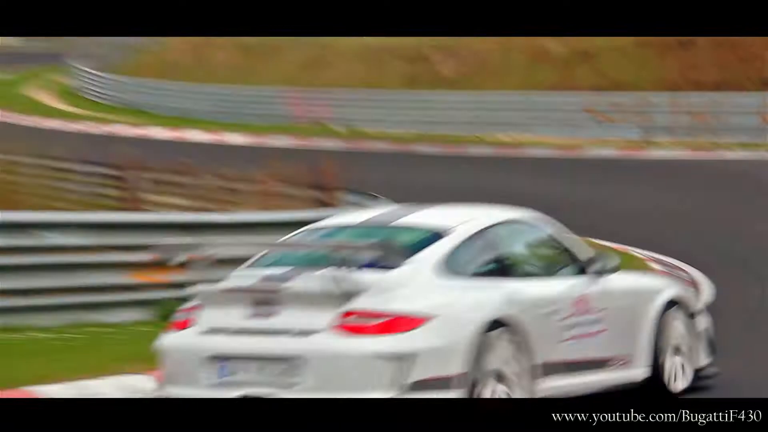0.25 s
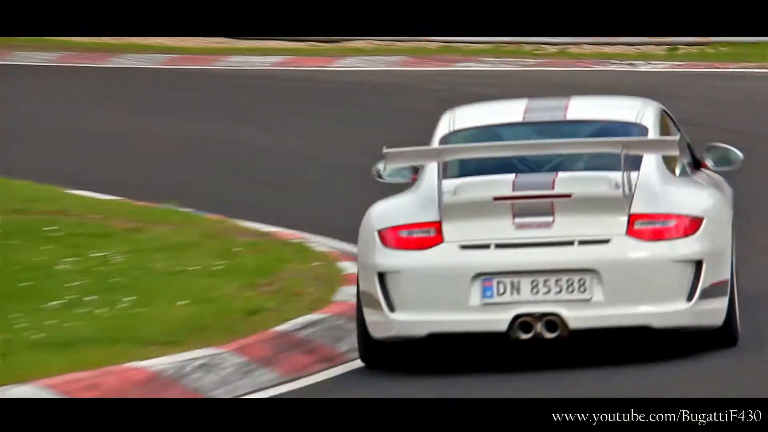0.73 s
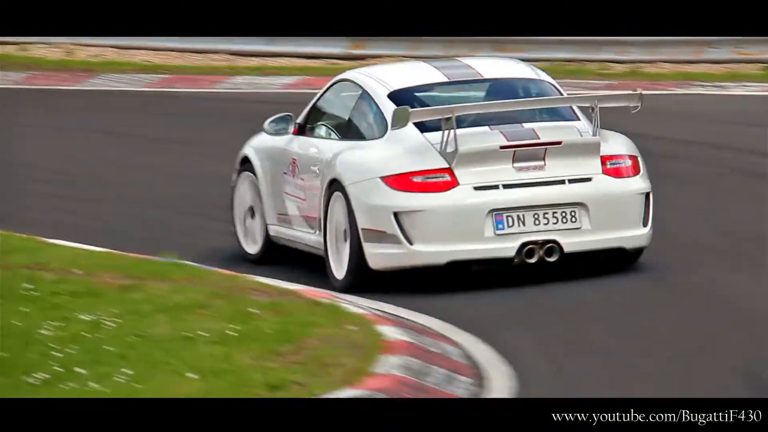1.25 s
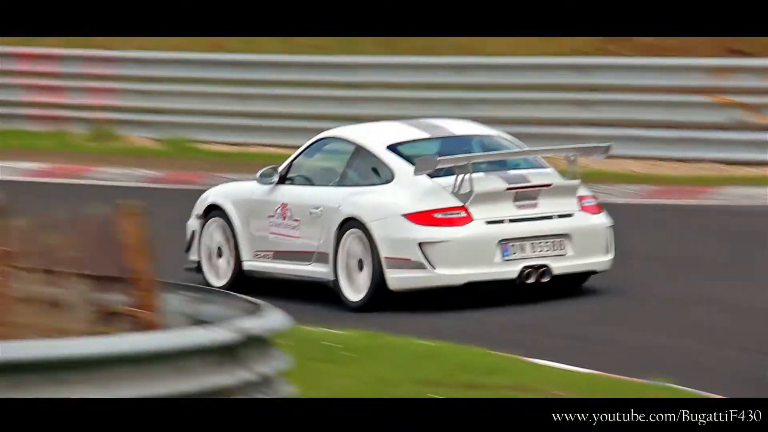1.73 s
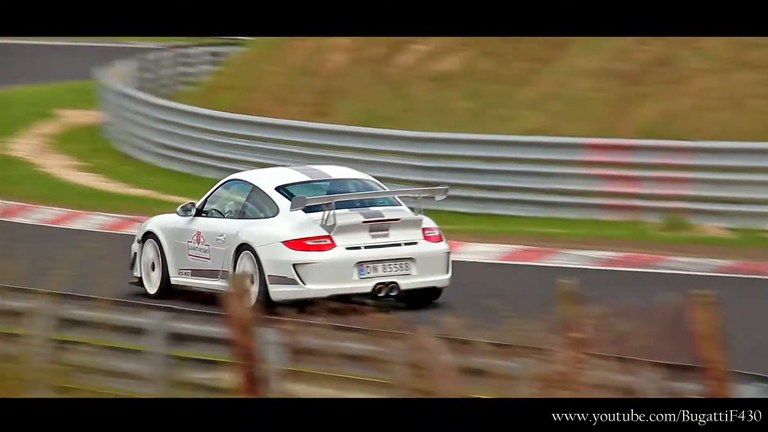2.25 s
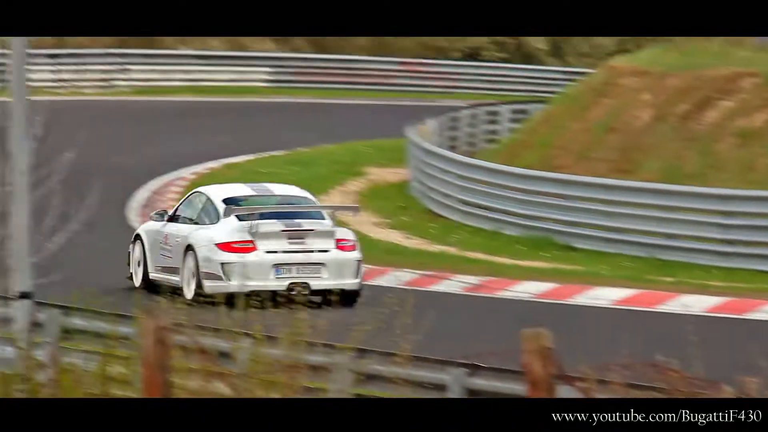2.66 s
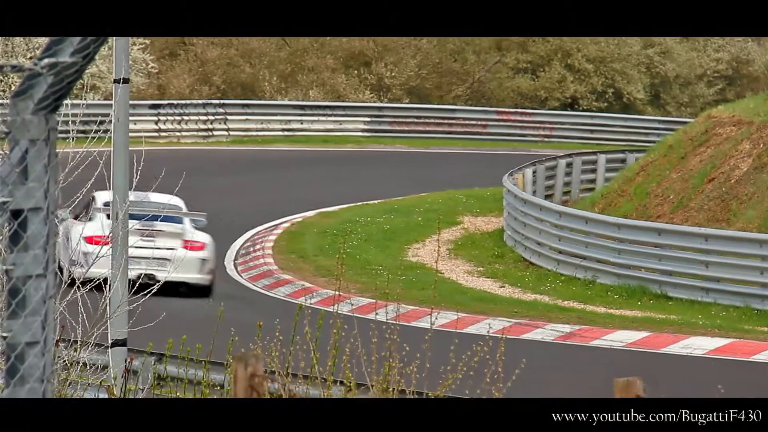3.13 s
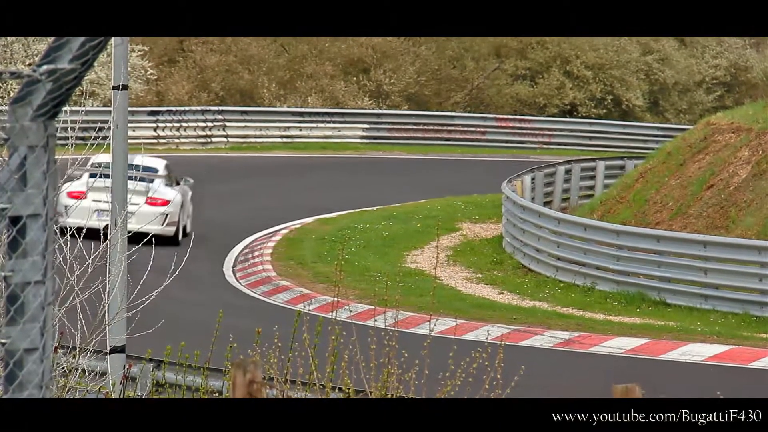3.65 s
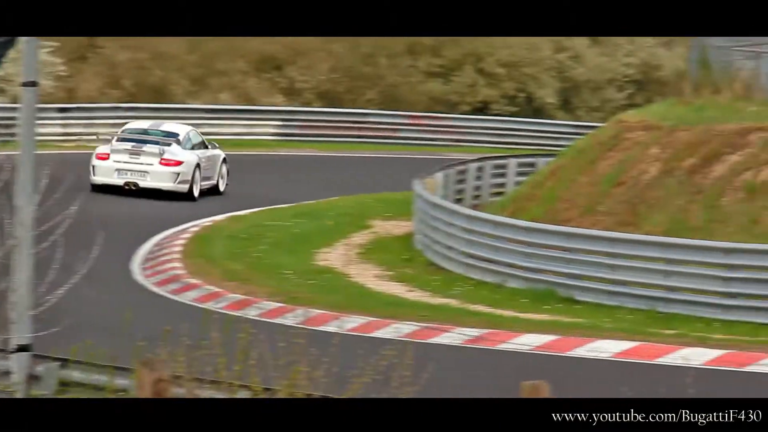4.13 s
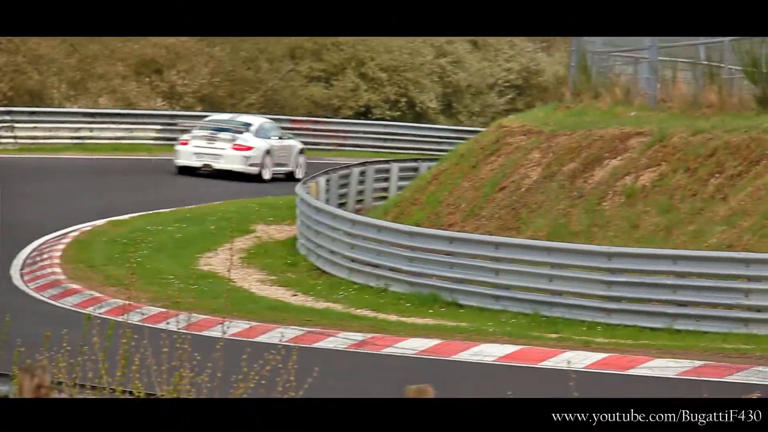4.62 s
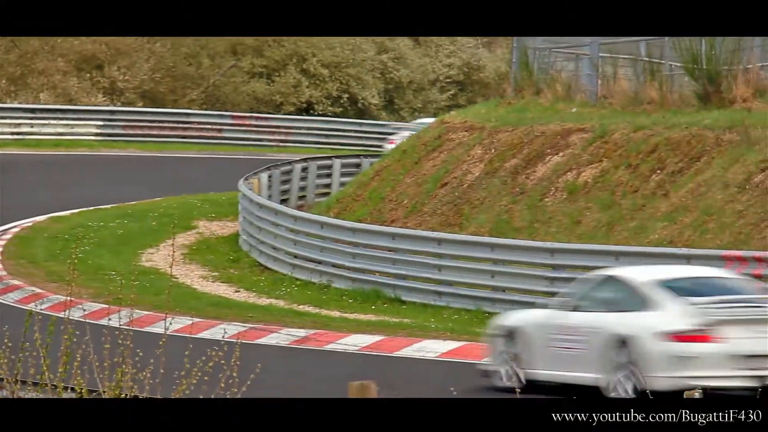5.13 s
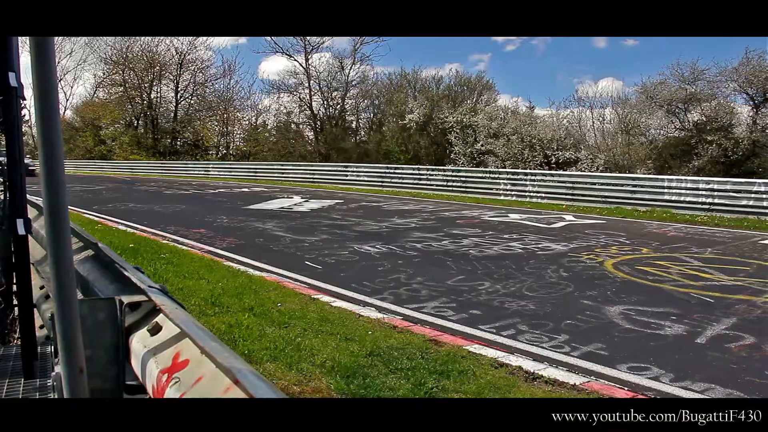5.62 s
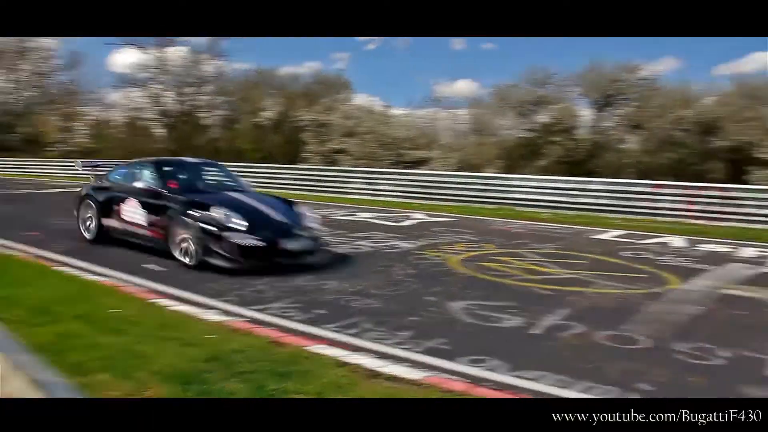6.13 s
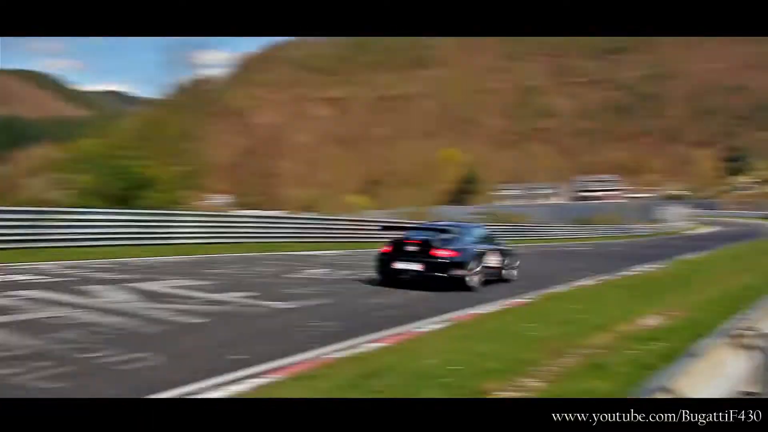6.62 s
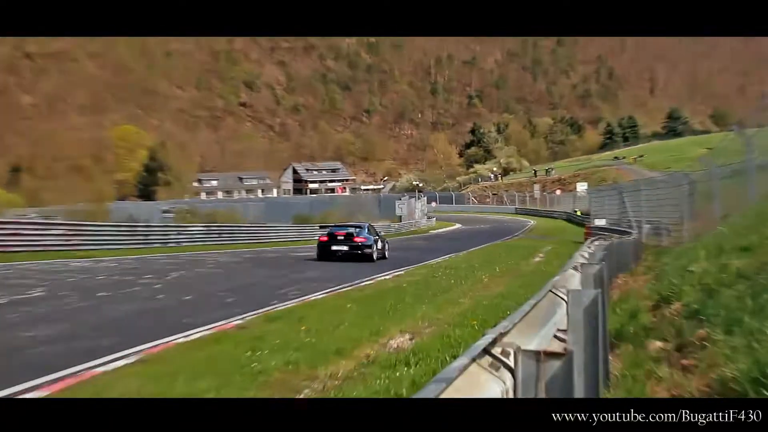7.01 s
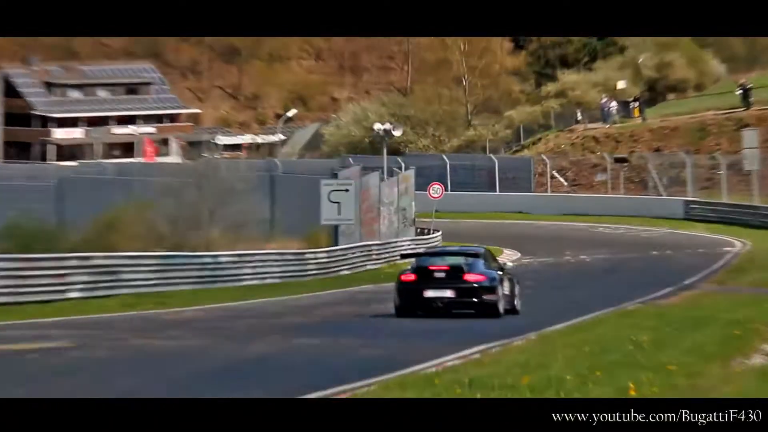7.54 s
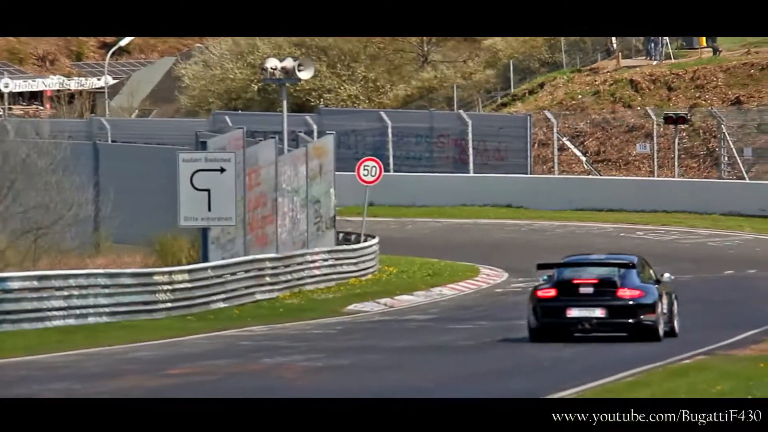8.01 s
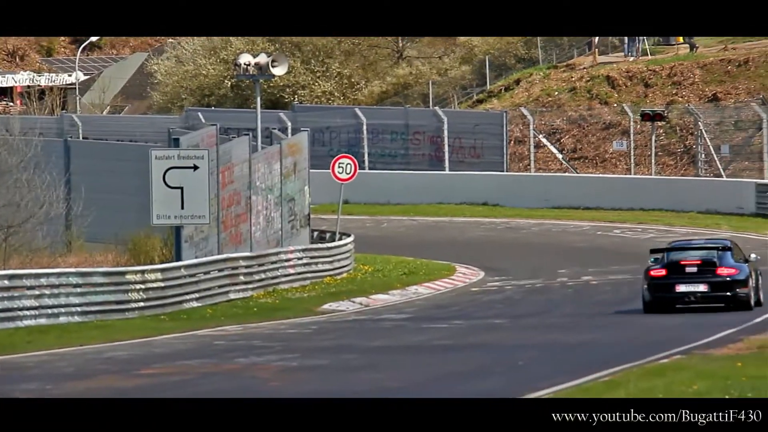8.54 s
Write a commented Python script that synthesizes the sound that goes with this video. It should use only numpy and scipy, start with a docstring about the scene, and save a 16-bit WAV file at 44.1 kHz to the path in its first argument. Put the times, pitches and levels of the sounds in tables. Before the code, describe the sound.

Outdoors beside a race circuit bend, a raspy high-revving six-cylinder car feathers its throttle, stutters briefly and accelerates away, fading. A second car coasts in, then opens up with a deep, booming drone so loud it clips the recorder. After a cut to the straight, a third car rushes close past the microphone, pitch falling, and recedes, leaving tyre noise, low drone and light breeze.

```python
"""Trackside at a race circuit, on the way out of a bend: three flat-six sports cars over tyre noise.
The first feathers its throttle, stutters briefly and pulls away; the second coasts in, then booms close by and clips
the recorder. The third sweeps past 7 m from the microphone, its pitch dropping, and recedes over a low drone and breeze.
Engines are sums of sines locked to the engine cycle, with puffing gas noise; tyres, air and some of the engine rasp
in the bend are coloured noise."""
import sys
import numpy as np
from scipy import signal
from scipy.fft import rfft, irfft, next_fast_len
from scipy.io import wavfile
from scipy.ndimage import uniform_filter1d, map_coordinates

SR = 44100
rng = np.random.default_rng(int(sys.argv[2]) if len(sys.argv) > 2 else 0)


def dump(signal):
    """Clip the signal to [-1, 1] and save it as 16-bit WAV at the path in sys.argv[1]."""
    limited = np.clip(np.atleast_2d(signal).T, -1, 1)
    pcm = np.round(limited * 32767).astype(np.int16)
    wavfile.write(sys.argv[1], SR, pcm)


N = 386746  # samples

# Exhaust overtones, octave of the firing tone upwards: [level/dB re the engine's octave control]
FIRST_TONES = [4.5, -7.5, -16, -15.5, -22.5, -24.5, -28, -30]
NEXT_GEAR_TONES = [1, -9.5, -20, -13.5, -12, -15.5, -19, -31]
SECOND_TONES = [5, 1.5, -12.5, -7, -14, -18]
THIRD_TONES = [-0.5, -10, -24, -14, -8, -15, -12]
# Weak lines from unequal cylinders, before the crank and bank offsets:
# [multiple of the engine cycle rate, level/dB re the octave control]
FIRST_UNEVEN = [(2, -11), (3, -8), (4, -9.5), (8, -10), (9, -15), (11, -10), (15, -16.5), (22, -27.5),
                (50, -33)]
NEXT_GEAR_UNEVEN = [(2, -8), (4, -7.5), (8, -10), (24, -25), (50, -26)]
SECOND_UNEVEN = [(2, -28.5), (4, -10), (8, -12.5), (14, -12.5), (24, -24), (40, -26.5)]
THIRD_UNEVEN = [(2, -3.5), (4, -6), (7, -24), (14, -20), (24, -30), (50, -13)]
# Exhaust gas noise colour: [f/Hz, relative level/dB]
GAS = [(30, -57.5), (120, -19), (300, -1.5), (600, -1.5), (1200, -14.5), (3000, -17.5), (12000, -84.5)]
# Roar colour in the bend and on the straight: [f/Hz, relative level/dB]
BEND_ROAR = [(30, -43.5), (150, -18), (330, -2), (600, 2), (850, 0.5), (1050, -1.5), (1450, -0.5),
             (2200, -9.5), (3200, -16), (4300, -26), (6000, -38.5), (15000, -79)]
STRAIGHT_ROAR = [(200, -35.5), (380, -2.5), (580, -12), (800, -2), (1350, 0.5), (1800, -1.5), (2500, -13.5),
                 (4000, -26.5), (12000, -85)]
# Tread sizzle colour, with engine rasp in the bend, and on the straight: [f/Hz, relative level/dB]
BEND_TREAD = [(1200, -35), (2000, -2.5), (2600, 1.5), (3200, 4), (3800, -13.5), (6000, -26.5),
              (14000, -57.5)]
STRAIGHT_TREAD = [(1200, -43.5), (2200, 3), (2700, 2), (3300, 2), (4400, -11.5), (6000, -18.5),
                  (14000, -60.5)]
# Air hiss, finest air spray, and low rumble colours: [f/Hz, relative level/dB]
HISS = [(2500, -22), (4500, -0.5), (6200, -1.5), (8000, -6), (11000, -12.5), (15500, -21)]
FIZZ = [(4000, -14), (7000, 0), (15500, -8)]
LOW = [(22, -30), (45, -19), (80, -2), (125, 3.5), (170, 6.5), (230, -6.5), (320, -13), (700, -57),
       (4000, -100)]
# Breeze colour: [f/Hz, relative level/dB]
BREEZE = [(20, -25.5), (50, -2), (110, -6.5), (400, -26), (4000, -67.5)]
# Silencer ringing modes: [f/Hz, relative level/dB, decay by 60 dB t/s]
SILENCER_MODES = [(88, -9, .11), (125, 0, .09), (170, -4, .06), (340, -12, .03), (620, -13, .02)]
# First car's engine speed: [t/s, firing rate f/Hz]
FIRST_REVS = [(0, 225.4), (.55, 220.5), (.68, 229.4), (.85, 219.1), (1.1, 230.4), (1.33, 265.3),
              (1.42, 240.6), (1.56, 261.3), (1.9, 278.2), (2.3, 289.5), (2.8, 314), (3.1, 319), (3.3, 307)]
# First car's throttle (ease off, shut, open, floor it, stutter, full, settle, swell and roughen, lift),
# before engine trims:
# [t/s, time taken t/s, firing tone level/dB, octave control level/dB, raggedness level/dB]
THROTTLE = [(0, 0.1, -17.5, -30.5, 5), (.51, 0.28, -31.5, -47.5, -5), (1.07, .14, -16, -27, 1),
            (1.24, 0.093, -13, -22, -0.5), (1.345, 0.057, -16, -27.5, 6), (1.521, .05, -16, -24.5, -2),
            (1.72, 0.11, -16, -27, -1), (2.42, 0.083, -12.5, -23.5, 2), (3.05, 0.19, -25.5, -41.5, -16)]
# Where that throttle starts: [firing tone level/dB, octave control level/dB, raggedness level/dB]
THROTTLE_START = (-15.5, -22, 3.5)
# The first car's stutter: [start t/s, end t/s]
STUTTER = (1.358, 1.535)
# Brief dips in the first car's tones: [t/s, level/dB, half length t/s]
DIPS = [(2.56, -6, 0.017), (2.775, -11, 0.015), (2.948, -8.5, 0.033)]
# A pull in one gear: [throttle opens t/s, fade starts t/s, lift t/s, firing rate f/Hz, rise Hz per s]
NEXT_GEAR_PULL = (3.68, 3.9, 5.35, 229.5, 32.5)
SECOND_PULL = (3.772, 4.03, 5.5, 162.5, 20)
# Swells of tyre noise and engine rasp as the cars work through the bend, before each layer's trim:
# [t/s, half length t/s, roar level/dB, tread level/dB, hiss level/dB, rumble level/dB]
SWELLS = [(0.129, 0.36, -26, -39, -49, -26.5), (1.417, .13, -31.5, -57, -70.5, -40),
          (2.018, 0.2, -60, -47, -65.5, -43), (3.014, 0.3, -30.5, -70, -55.5, -29),
          (3.987, 0.86, -32.5, -48.5, -60.5, -36), (5.055, 0.16, -41.5, -46, -71.5, -35.5)]
# Noise between the swells: [roar level/dB, tread level/dB, hiss level/dB, rumble level/dB]
BEND_FLOOR = (-37.5, -61.5, -68, -44.5)
# Short scuffs, thuds and squeaks of tyres and brakes:
# [t/s, level/dB, centre f/Hz, half width/octaves, half length t/s]
SCUFFS = [(1.883, -43.5, 3000, .15, 0.031), (2.149, -44, 2850, .17, .02), (2.68, -35, 88.03, 0.13, 0.13),
          (3.741, -66, 8660, .07, 0.11), (4.005, -26, 1480, 0.49, 0.027), (5.519, -35, 108, 0.79, 0.03),
          (6.168, -29.5, 1234, 0.078, 0.052), (7.607, -29.5, 1290, 0.48, 0.048),
          (8.637, -37, 1370, 0.64, 0.035), (8.678, -33.5, 150, 0.44, 0.026)]
# Tones through a pull, before engine trims: (full level/dB, fade dB per s, fall after the lift dB per s)
NEXT_GEAR_FIRING, NEXT_GEAR_OCTAVE = (-20.5, 7.5, 24), (-24.5, 8.3, 60)
SECOND_FIRING, SECOND_OCTAVE = (-2.71, 9.6, 12), (-28.5, 3.3, 49)
# Laws of the third car's pass: (level/dB when nearest, power of distance on approach, power going away);
# the engine's two are before its trims
PASS_FIRING, PASS_OCTAVE = (-19, 2.6, 1.13), (-21.5, 2.6, 1.35)
PASS_ROAR, PASS_TREAD, PASS_HISS = (-18.5, 1.18, 0.83), (-24, 1.37, 0.8), (-36.5, 2.3, 1.41)
PASS_RUMBLE = (-18.5, 0.94, 1.49)
PASS_FIZZ = (-42, 4.5, 3.2)  # carries only a few metres

PIPE_HZ, PIPE_WIDTH_HZ, PIPE_DB = 1325, 38, 6  # exhaust pipe resonance
SURGE_DEPTH_HZ, SURGE_PER_S, SURGE_END_S = 5.96, 5.1, 0.6  # revs rock on part throttle
FIRST_AWAY_S, FIRST_FADE_DB_PER_S = 1.35, 7.5  # the first car draws away out of the bend
STUTTER_DB = -8
# the second car rolls in off the throttle; levels before engine trims
COAST_START_S, COAST_HZ, COAST_FIRING_DB, COAST_OCTAVE_DB = 3.3, 157.3, -27, -43.5
PASS_S, SPEED_M_PER_S, DISTANCE_M, SOUND_M_PER_S = 6.43, 53, 7, 343
ENGINE_LAG_S = .04  # the engine sits at the rear
THIRD_HZ, THIRD_SAG_HZ_PER_S = 335.4, 30.5
THIRD_LIFT_S, THIRD_LIFT_TIME_S, THIRD_LIFT_DB = 6.95, .25, -15  # the firing tone dies as the driver lifts
BRAKE_S, BRAKE_TIME_S, BRAKE_DB = 7.73, 0.56, -10  # slowing for the next bend quietens the tyres
BOW_WAVE_LEAD_S, BOW_WAVE_S, BOW_WAVE_DB = .13, 0.069, 7.5  # air pushed ahead of the nose
BEND_END_S, CROSSFADE_S = 5.59, 0.55  # bend noise gives way to the straight
DRONE_DB, BREEZE_DB = -41, -48.5
SCUFF_SPAN_S = 1.2
TOP_HZ = 15760  # recorder's band limit
CONTROL_STEP = 128  # samples between line levels


def engine(gate, hz, firing_db, octave_db, tones, uneven, ragged_db=0, *,
           tone_db, over_db, bank_db, rasp_db, flutter_db, jitter):
    """Six firings per cycle: strong firing tones, weaker lines between, and gas puffing at each firing."""
    on = gate > 0
    t = clock()[on]
    controls = (hz, firing_db, octave_db, ragged_db)
    hz, firing_db, octave_db, ragged_db = [np.broadcast_to(c, N)[on] for c in controls]
    slow = slice(None, None, CONTROL_STEP)  # line levels move slowly
    phase_drift = jitter * amp(ragged_db) * wobble(45, t)
    cycle = 2 * np.pi * np.cumsum(hz) / SR / 6 + phase_drift
    lines = np.zeros(len(t))
    for k in range(2, 6 * (len(tones) + 1) + 1):
        if k == 6:  # the firing tone itself is added below
            continue
        crank, bank = k % 2 == 0, k % 3 == 0
        overtone = k // 6 - 2
        if crank and bank:
            # the higher overtones waver more on their way through the air
            db = tones[overtone] + min(1 + overtone, 2.5) * wobble(14, t[slow])
        else:
            # whole turns of the crank and the pipes of the two cylinder banks have their own offsets
            offset_db = bank_db if bank else 0 if crank else -6
            db = np.interp(k, *np.transpose(uneven)) + offset_db
            db = db + ragged_db[slow] * (overtone >= -1) + 2.5 * wobble(8, t[slow])
        line_hz = k * hz[slow] / 6
        db = db + PIPE_DB * np.exp(-.5 * ((line_hz - PIPE_HZ) / PIPE_WIDTH_HZ) ** 2)
        start_phase = rng.uniform(0, 2 * np.pi)
        lines += np.interp(t, t[slow], amp(db)) * np.sin(k * cycle + start_phase)
    firing_tone = np.sin(6 * cycle)
    gas = rush(GAS, patchy_db=1.5)[on] * (1 + .6 * firing_tone)
    upper = amp(over_db) * np.sqrt(2) * lines + amp(rasp_db + .5 * ragged_db) * gas
    flutter = amp(flutter_db * amp(ragged_db) * wobble(24, t))
    firing = np.sqrt(2) * amp(firing_db + tone_db) * firing_tone
    out = np.zeros(N)
    out[on] = flutter * (firing + amp(octave_db) * upper)
    return out * gate


def first_car():
    """Part throttle in the bend, full throttle out of it, then a lift for the gear change."""
    surge = SURGE_DEPTH_HZ * np.cos(2 * np.pi * SURGE_PER_S * clock()) * (1 - ramp(SURGE_END_S, 0.044))
    hz = curves(FIRST_REVS)[0] + surge
    state = np.array(THROTTLE_START)[:, None]
    for s, taken, *setting in THROTTLE:
        state = state + (np.array(setting)[:, None] - state) * ramp(s, taken)
    firing_db, octave_db, ragged_db = state
    dips_db = sum(db * swell(s, length) for s, db, length in DIPS)
    away_db = -FIRST_FADE_DB_PER_S * since(FIRST_AWAY_S) + dips_db
    echo_db = beating(dip_s=2.047, per_s=1.7, share=0.31) * ramp(FIRST_AWAY_S, .3)
    return engine(presence(0, 3.33), hz, firing_db + away_db + echo_db, octave_db + away_db,
                  FIRST_TONES, FIRST_UNEVEN, ragged_db,
                  tone_db=-0.5, over_db=-0.5, bank_db=6.5, rasp_db=-15, flutter_db=1.5, jitter=.006)


def stutter():
    """A skipped firing once per engine cycle thumps the first car's silencer and spits gas."""
    start, end = STUTTER
    running = (clock() > start) * (clock() < end)
    cycles = np.cumsum(curves(FIRST_REVS)[0] * running) / SR / 6
    skips = np.diff(np.ceil(cycles), prepend=0) * amp(rng.standard_normal(N))
    t = np.arange(SR // 12) / SR
    ring = sum(amp(db - 60 * t / t60) * np.sin(2 * np.pi * hz * t) for hz, db, t60 in SILENCER_MODES)
    thumps = signal.fftconvolve(skips, ring / np.abs(ring).max())[:N]
    spit_envelope = signal.fftconvolve(skips, amp(-60 * t / 0.02))[:N]
    spit = amp(-15) * spit_envelope * rng.standard_normal(N)
    # the tailpipes pass neither deep bass nor high treble
    tailpipes = signal.butter(4, [70, 3000], "band", fs=SR, output="sos")
    return amp(STUTTER_DB) * signal.sosfilt(tailpipes, thumps + spit)


def first_car_next_gear():
    """The first car pulls on, farther off: its firing rate climbs as its tones fade."""
    hz, firing_db, octave_db = pull(NEXT_GEAR_PULL, NEXT_GEAR_FIRING, NEXT_GEAR_OCTAVE)
    gate = ramp(NEXT_GEAR_PULL[0], 0.27) * (1 - ramp(5.85, .12))
    return engine(gate, hz, firing_db, octave_db, NEXT_GEAR_TONES, NEXT_GEAR_UNEVEN,
                  tone_db=1.5, over_db=-1.5, bank_db=6, rasp_db=-10.0, flutter_db=1.1, jitter=0.0039)


def second_car():
    """It coasts in, then opens up and booms on the firing tone; reflections make the tones beat."""
    hz, firing_db, octave_db = pull(SECOND_PULL, SECOND_FIRING, SECOND_OCTAVE)
    echoes_in = ramp(4.3, .6)
    firing_db = firing_db + beating(dip_s=4.97, per_s=2.95, share=0.2)
    firing_db = firing_db + beating(dip_s=4.96, per_s=1.1, share=.36) * echoes_in
    octave_db = octave_db + beating(dip_s=5.27, per_s=6.3, share=.3) * echoes_in
    coasting = np.array([[COAST_HZ], [COAST_FIRING_DB], [COAST_OCTAVE_DB]])
    throttle = ramp(SECOND_PULL[0], .075)
    controls = coasting + throttle * (np.array([hz, firing_db, octave_db]) - coasting)
    gate = ramp(COAST_START_S, 0.15) * (1 - ramp(5.95, .08))
    return engine(gate, *controls, SECOND_TONES, SECOND_UNEVEN,
                  tone_db=-0.18, over_db=-3.5, bank_db=-1.0, rasp_db=-10.0, flutter_db=0.06, jitter=.005)


def third_car():
    """A fast, close pass: the Doppler shift drops the pitch while the revs sag."""
    t = clock() - PASS_S - ENGINE_LAG_S
    along = SPEED_M_PER_S * t
    receding = SPEED_M_PER_S * along / np.hypot(along, DISTANCE_M)
    hz = (THIRD_HZ - THIRD_SAG_HZ_PER_S * t) / (1 + receding / SOUND_M_PER_S)
    lift_db = THIRD_LIFT_DB * ramp(THIRD_LIFT_S, THIRD_LIFT_TIME_S)
    firing_db = passing_db(PASS_FIRING, ENGINE_LAG_S) + lift_db
    octave_db = passing_db(PASS_OCTAVE, ENGINE_LAG_S)
    gate = ramp(6.08, .15) * (1 - ramp(6.92, 0.59))
    return engine(gate, hz, firing_db, octave_db, THIRD_TONES, THIRD_UNEVEN,
                  tone_db=-1, over_db=-3.0, bank_db=6.5, rasp_db=-5.5, flutter_db=0.3, jitter=0.0057)


def straight_tyres():
    """Roar, tread sizzle and air noise of the fast pass, set by distance, with a surge of air at the nose."""
    brake_db = BRAKE_DB * ramp(BRAKE_S, BRAKE_TIME_S)
    bow_db = BOW_WAVE_DB * swell(PASS_S - BOW_WAVE_LEAD_S, BOW_WAVE_S)
    roar_db = passing_db(PASS_ROAR) + bow_db + 0.58 * brake_db + 0.25 * wobble(25, clock())
    roar = amp(roar_db) * rush(STRAIGHT_ROAR, patchy_db=2.0)
    tread = amp(passing_db(PASS_TREAD) + brake_db) * rush(STRAIGHT_TREAD, patchy_db=2.0)
    hiss = amp(passing_db(PASS_HISS)) * rush(HISS, patchy_db=3.3)
    fizz = amp(passing_db(PASS_FIZZ)) * rush(FIZZ, patchy_db=.5)
    return (roar + tread + hiss + fizz) * ramp(BEND_END_S, CROSSFADE_S)


def bend_tyres():
    """Tyre noise and engine rasp in the bend, with hiss and rumble: swells add to a steady floor in power."""
    power = amp(BEND_FLOOR)[:, None] ** 2
    for s, length, *dbs in SWELLS:
        power = power + (amp(dbs)[:, None] * swell(s, length)) ** 2
    roar, tread, hiss, low = np.sqrt(power)
    roar = roar * amp(2 + 0.33 * wobble(18, clock())) * rush(BEND_ROAR, patchy_db=1.92)
    tread = tread * amp(2.9 * wobble(25, clock())) * rush(BEND_TREAD, patchy_db=1.0)
    hiss = hiss * amp(-1.5 + wobble(70, clock())) * rush(HISS, patchy_db=1.5)
    low = low * rush(LOW, patchy_db=5.0)
    return (roar + tread + hiss + low) * (1 - ramp(BEND_END_S, CROSSFADE_S))


def scuffs():
    """Each scuff is a brief swell of noise in one band."""
    n = int(SCUFF_SPAN_S * SR)
    hz, out = np.fft.rfftfreq(n, 1 / SR), np.zeros(N + n)
    t = (np.arange(n) - n // 2) / SR
    for s, db, centre_hz, width, length in SCUFFS:
        response = np.exp(-.5 * (np.log2((hz + 1) / centre_hz) / width) ** 2)
        band = irfft(rfft(rng.standard_normal(n)) * response, n)
        start = round(s * SR) - n // 2
        out[start:][:n] += amp(db) * unit(band) * np.exp(-.5 * (t / length) ** 2)
    return out[:N]


def rumble():
    """Along the straight: low drone of the passing car and of engines round the circuit, and a breeze."""
    drone_level = np.hypot(amp(passing_db(PASS_RUMBLE)), amp(DRONE_DB))
    drone = drone_level * rush(LOW, patchy_db=2.0)
    breeze = amp(BREEZE_DB) * rush(BREEZE, patchy_db=5.0)
    return (drone + breeze) * ramp(BEND_END_S - CROSSFADE_S, CROSSFADE_S)


def rush(spectrum, patchy_db):
    """Turbulent noise of rms 1: a fixed colour with drifting patches."""
    z = signal.stft(rng.standard_normal(N), nperseg=1024)[2]
    across_hz = uniform_filter1d(rng.standard_normal(z.shape), size=5, axis=0)
    patches = unit(uniform_filter1d(across_hz, size=7, axis=1))
    noise = signal.istft(z * amp(patchy_db * patches), nperseg=1024)[1][:N]
    f, db = np.transpose(spectrum)
    return unit(filtered(noise, lambda hz: amp(np.interp(np.log(hz + 1), np.log(f), db))))


def passing_db(law, lag=0):
    """Level of one sound of the third car, set by its distance from the microphone."""
    db, approach, away = law
    along = SPEED_M_PER_S * (clock() - PASS_S - lag)
    power = np.where(along < 0, approach, away)
    return db - power * 20 * np.log10(np.hypot(along, DISTANCE_M) / DISTANCE_M)


def pull(timing, *tones):
    """Revs climb steadily in one gear; each tone holds, fades with distance and falls away after the lift."""
    open_s, fade_s, lift_s, hz, rise = timing
    levels = [db - fade * since(fade_s) - fall * since(lift_s) for db, fade, fall in tones]
    return hz + rise * since(open_s), *levels


def beating(dip_s, per_s, share):
    """Level in dB of a moving tone that meets its own reflection, in and out of step."""
    reflection = share * np.exp(2j * np.pi * per_s * (clock() - dip_s))
    return 20 * np.log10(np.abs(1 - reflection))


def wobble(rate, t):
    """A smooth random curve at times t, rate knots a second."""
    grid = np.linspace(t[0], t[-1], 2000)
    knots = rng.standard_normal(2048)
    return np.interp(t, grid, map_coordinates(knots, [grid * rate], mode="wrap"))


def filtered(x, response):
    """x times a response of frequency."""
    m = next_fast_len(N + SR // 4)
    return irfft(rfft(x, m) * response(np.fft.rfftfreq(m, 1 / SR)), m)[:N]


def amp(db):
    """Decibels to gain."""
    return 10 ** (np.asarray(db) / 20)


def unit(x):
    """Scale to rms 1."""
    return x / np.sqrt(np.mean(x ** 2) + 1e-20)


def clock():
    """The time of every sample in seconds."""
    return np.arange(N) / SR


def curves(rows):
    """One value per sample for each column after the time."""
    s, *cols = np.transpose(rows)
    return [np.interp(clock(), s, c) for c in cols]


def ramp(start, length):
    """0 before start, rising evenly to 1 over length seconds."""
    return np.clip((clock() - start) / length, 0, 1)


def presence(start, end, fade=0.054):
    """1 from start to end, fading out on either side."""
    return ramp(start - fade, fade) * (1 - ramp(end, fade))


def since(start):
    """Seconds gone by since start, 0 before it."""
    return np.maximum(clock() - start, 0)


def swell(s, length):
    """A bell-shaped rise and fall that reaches 1 at s."""
    return np.exp(-.5 * ((clock() - s) / length) ** 2)


def scene():
    """All three cars on the circuit, with tyres, scuffs and background."""
    cars = first_car() + stutter() + first_car_next_gear() + second_car() + third_car()
    return (cars + straight_tyres() + bend_tyres() + scuffs() + rumble())[None]


def record(dry):
    """The recorder clips at full scale and keeps nothing above its band limit."""
    clipped = np.clip(dry[0], -1, 1)
    return filtered(clipped, lambda hz: hz < TOP_HZ)[None]


dry = scene()
out = record(dry)
dump(out)
```